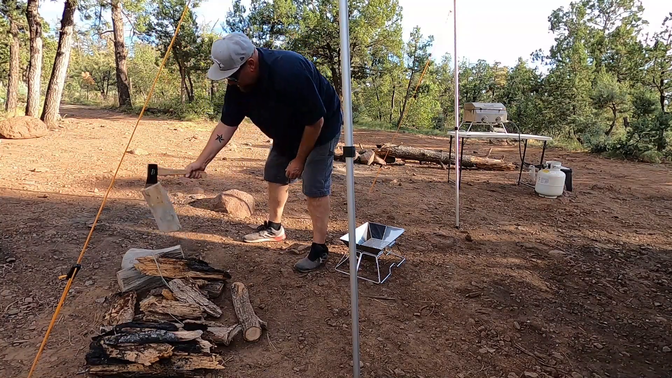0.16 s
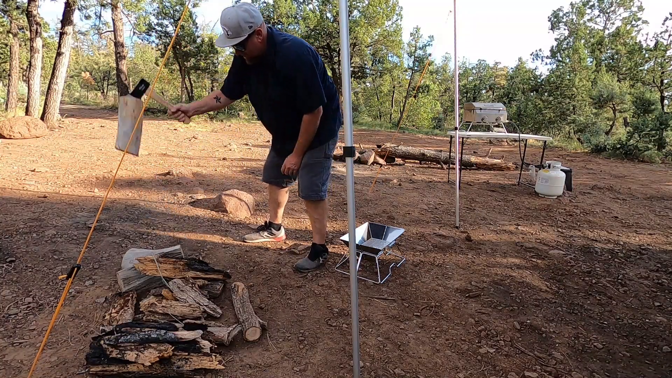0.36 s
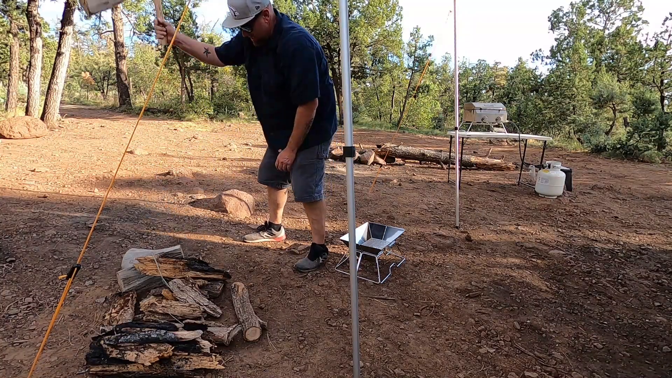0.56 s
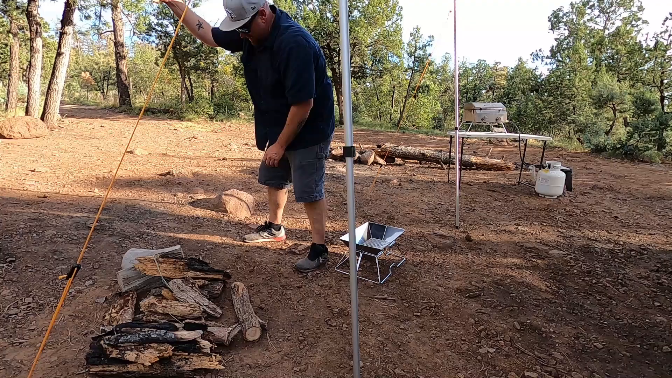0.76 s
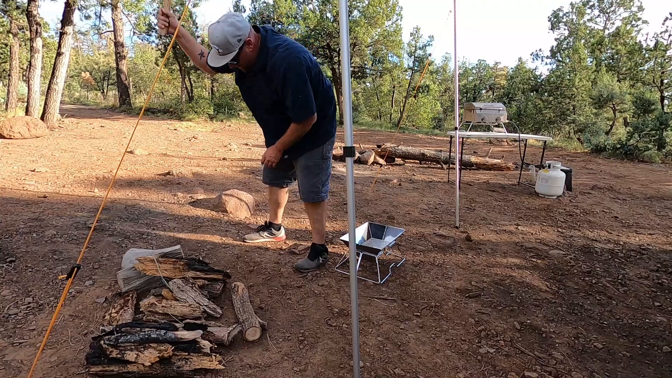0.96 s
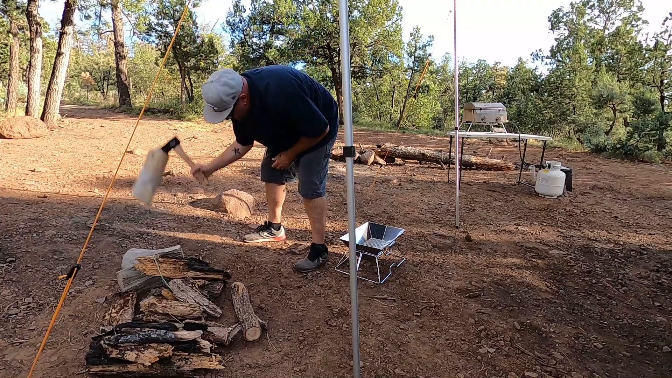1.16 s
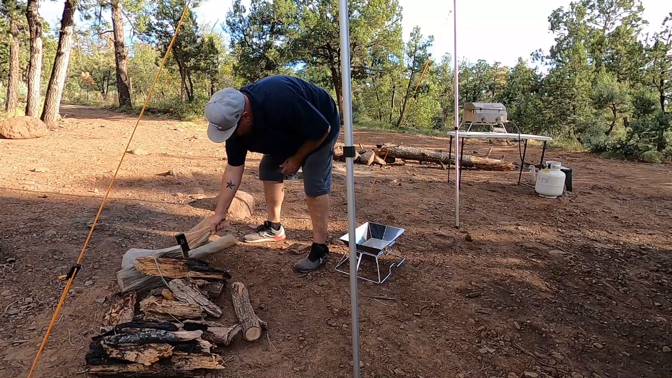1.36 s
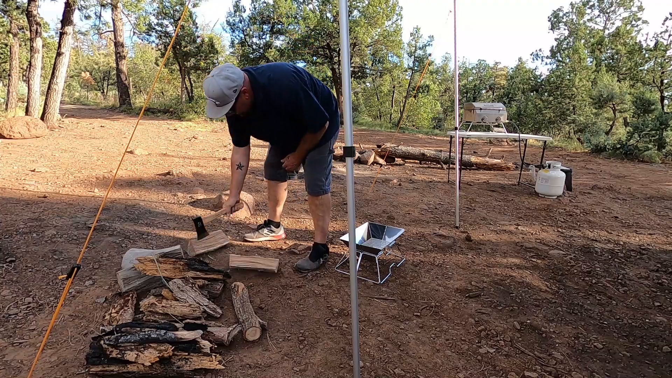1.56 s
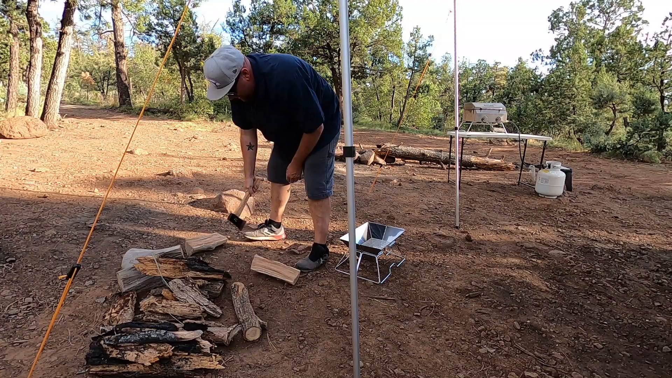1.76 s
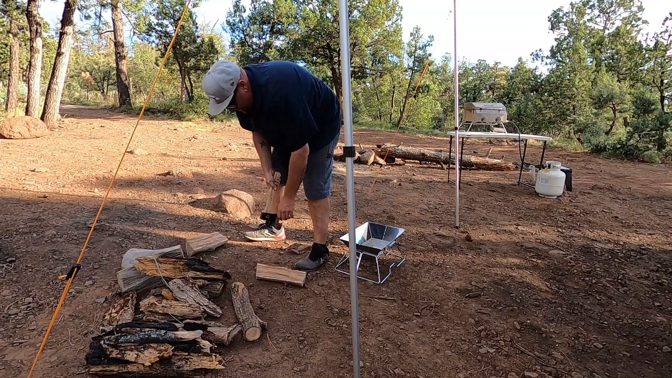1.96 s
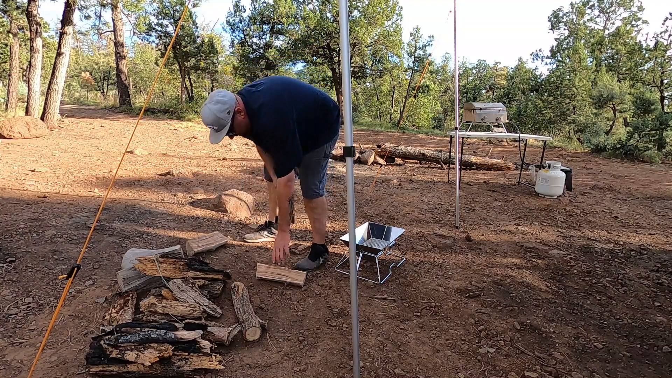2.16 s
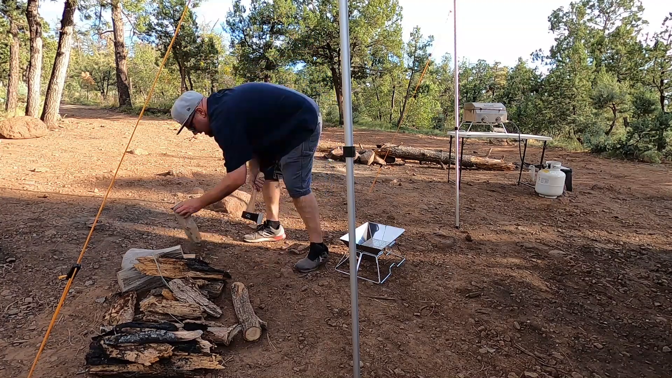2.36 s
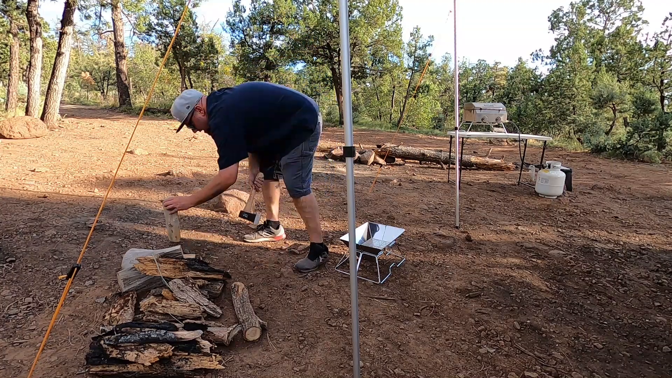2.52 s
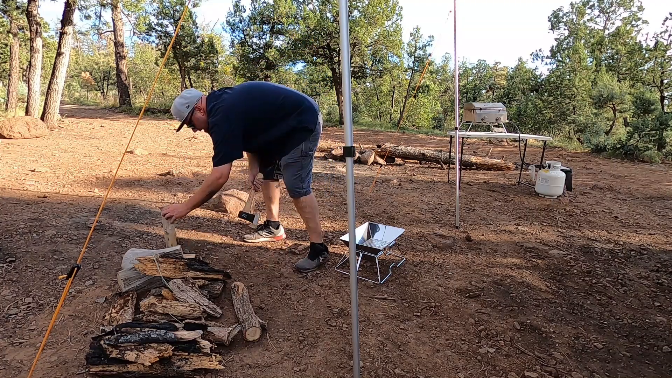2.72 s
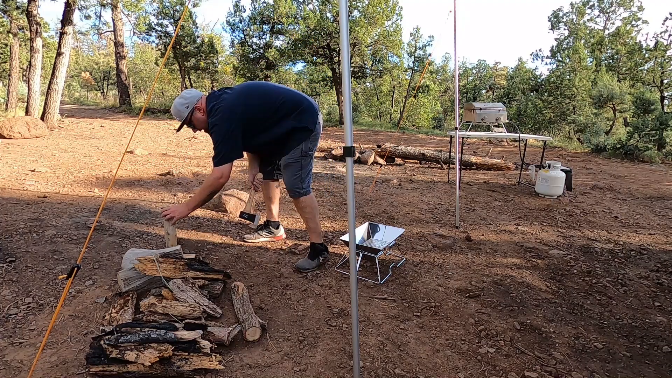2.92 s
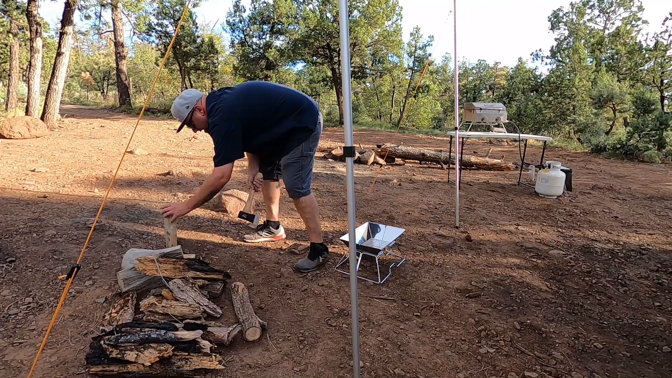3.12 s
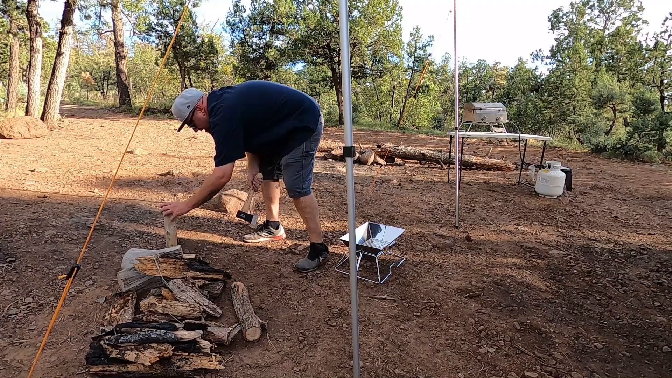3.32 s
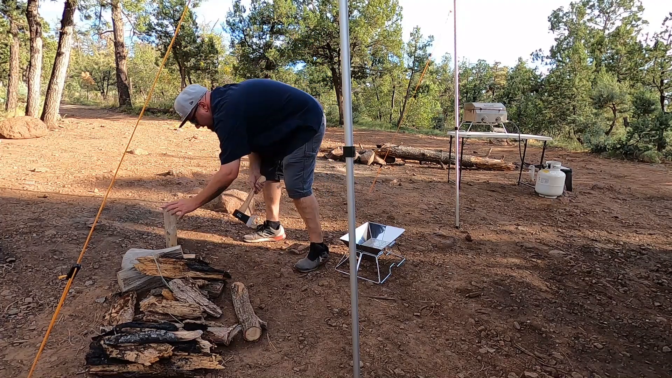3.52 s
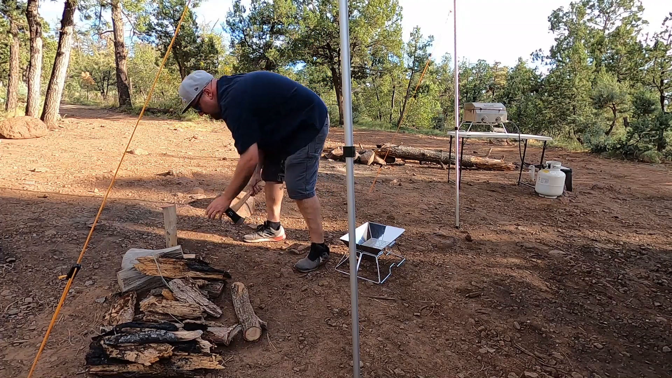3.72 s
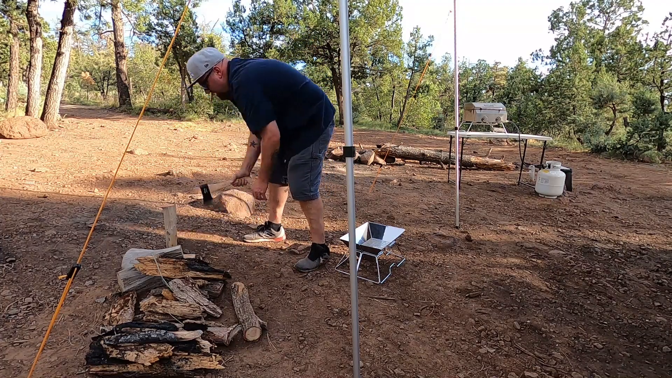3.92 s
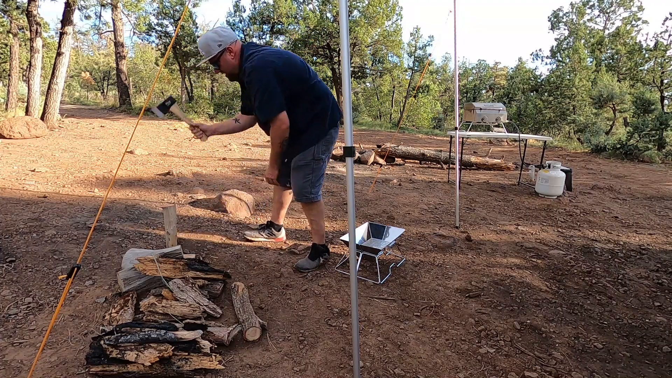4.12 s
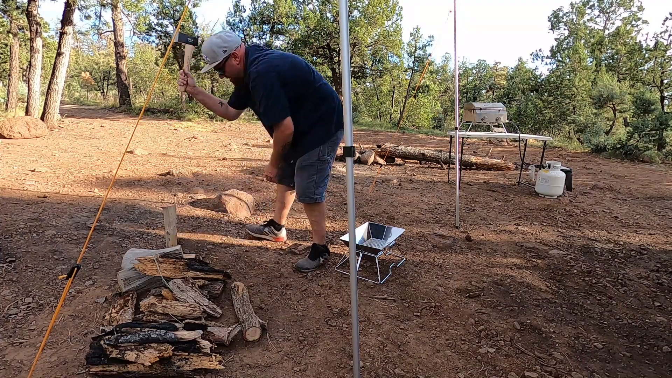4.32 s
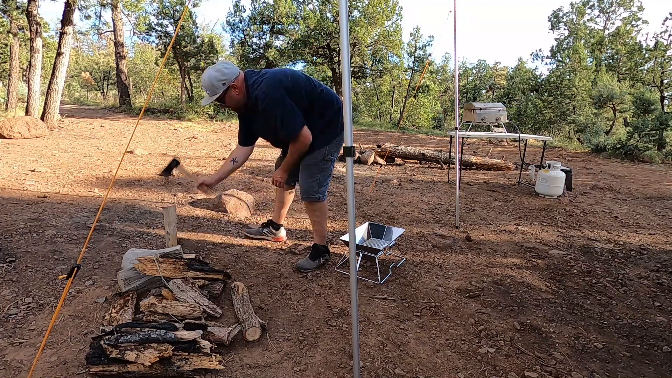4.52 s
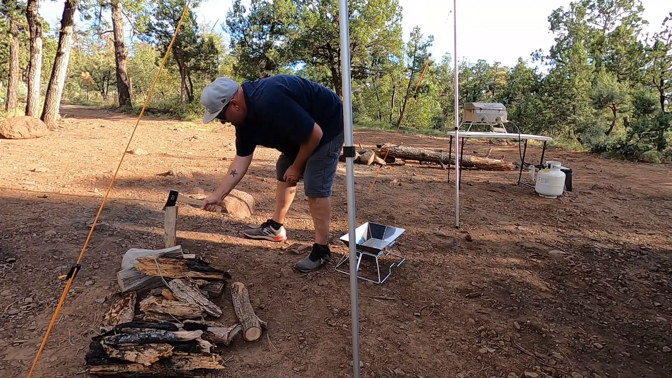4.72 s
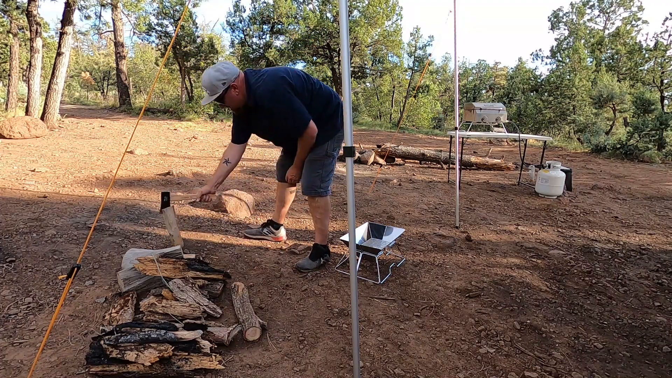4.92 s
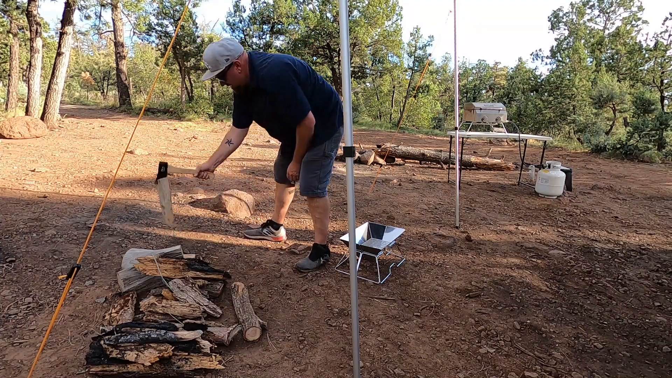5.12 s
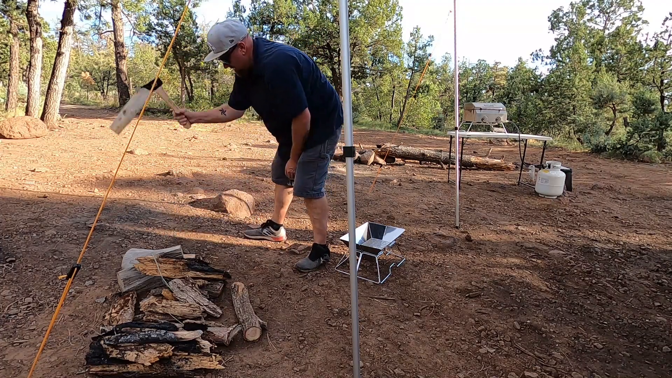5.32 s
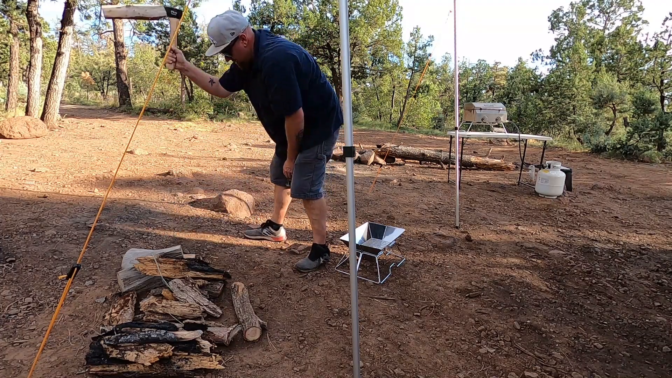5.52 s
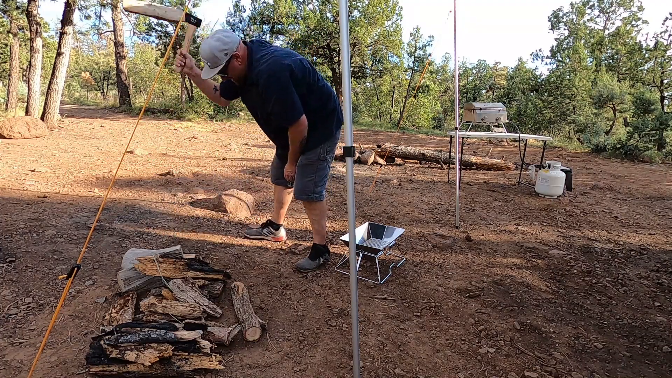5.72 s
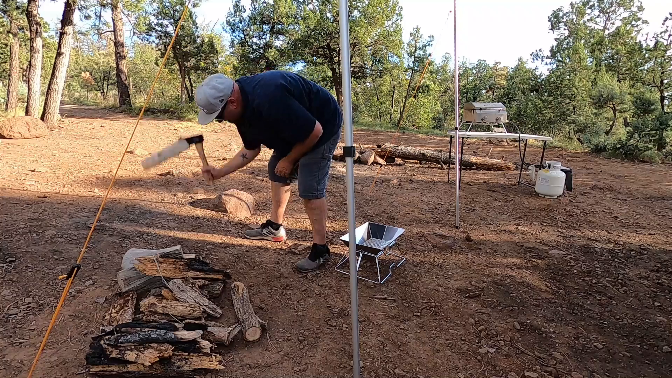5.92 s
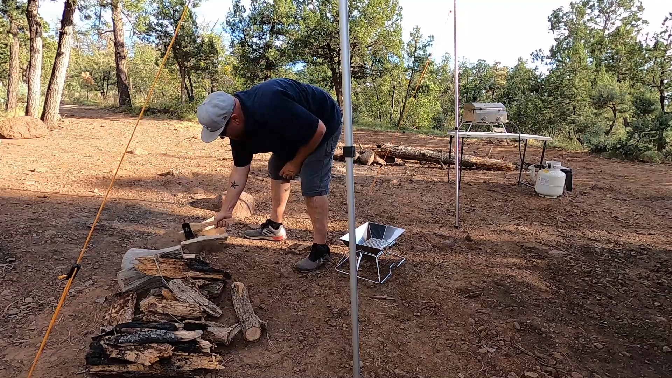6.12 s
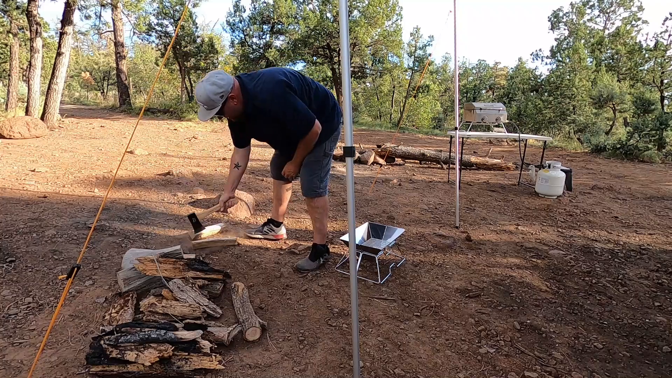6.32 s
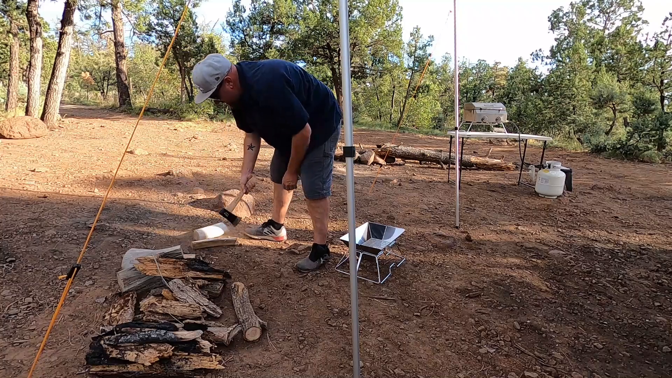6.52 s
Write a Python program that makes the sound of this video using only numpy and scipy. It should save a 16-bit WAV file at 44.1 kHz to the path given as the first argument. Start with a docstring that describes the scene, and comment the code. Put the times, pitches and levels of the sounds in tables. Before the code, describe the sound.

Firewood splitting outdoors, heard from a few metres: a loud crack and low thud, then wooden halves knocking and rolling. A quieter pause has light wood taps, tiny metallic tinkles and grit underfoot. A shoe rasps on dirt before a second hard chop; moments later a third blow rips fibres with bright splintering and ringing wood. Faint breeze hisses through pines, with a short woodland echo.

```python
"""A dirt campsite among pines, heard from a few metres: a man splits firewood with a hatchet.
He slams a stuck log onto the block and its halves clatter away, stands up a new log, bites the blade into it
and slams that down until it tears apart. Wood contacts are band-passed noise bursts that may excite modes; thuds,
steel and hollow notes are damped sines; chips and grit are sparse snaps; scuffs, swings and breeze are shaped noise."""
import sys
import numpy as np
from scipy import signal
from scipy.fft import rfft, irfft, next_fast_len
from scipy.io import wavfile
from scipy.ndimage import map_coordinates

SR = 44100
rng = np.random.default_rng(int(sys.argv[2]) if len(sys.argv) > 2 else 0)


def generate_wav(signal):
    """Clip the signal to [-1, 1] and save it as 16-bit WAV at the path in sys.argv[1]."""
    frames = np.transpose(np.atleast_2d(signal))
    scaled = np.clip(frames, -1, 1) * 32767
    pcm = np.round(scaled).astype(np.int16)
    wavfile.write(sys.argv[1], SR, pcm)


N = 289737
AGE = np.arange(SR // 2) / SR  # time since a contact, s


def amp(db):
    """Decibels to gain."""
    return 10 ** (np.asarray(db) / 20)


def unit(x):
    """Scale to rms 1."""
    return x / np.sqrt(np.mean(x ** 2) + 1e-20)


def fade(t60_s, t_s=AGE):
    """Exponential decay, 60 dB in t60_s."""
    return np.exp(-np.log(1000) * t_s / np.maximum(t60_s, 1e-3))


def along(points, hz):
    """Interpolate (f/Hz, value) points on a log frequency axis."""
    f, value = np.transpose(points)
    return np.interp(np.log(hz + 1), np.log(f + 1), value)


def curves(rows):
    """Interpolate each column after the time to one value per sample."""
    t, *columns = np.transpose(rows)
    return [np.interp(np.arange(N) / SR, t, column) for column in columns]


def wobble(rate_hz):
    """Smooth random curve through rate_hz knots a second."""
    knots = rng.standard_normal(256)
    return map_coordinates(knots, [np.arange(N) * rate_hz / SR], mode="wrap")


def add(track, t_s, sound):
    """Mix a sound into the track at t_s."""
    part = track[max(0, round(t_s * SR)):][:len(sound)]
    part += sound[:len(part)]


def filtered(x, response):
    """Apply a complex response of frequency to x."""
    m = next_fast_len(len(x) + SR // 2)
    return irfft(rfft(x, m) * response(np.fft.rfftfreq(m, 1 / SR)), m)[:len(x)]


def lowpass(x, order, hz):
    """Butterworth low-pass."""
    return signal.sosfilt(signal.butter(order, hz, fs=SR, output="sos"), x)


def highpass(x, order, hz):
    """Butterworth high-pass."""
    return signal.sosfilt(signal.butter(order, hz, "high", fs=SR, output="sos"), x)


def resonance(f, hz, width_hz):
    """Causal response of one mode, 1 at its peak."""
    return 1j * f * width_hz / (hz * hz - f * f + 1j * f * width_hz)


def noise_band(n, hz, width_hz, order=2):
    """White noise through repeated resonances, at rms 1."""
    return unit(filtered(rng.standard_normal(n), lambda f: resonance(f, hz, width_hz) ** order))


def coloured(x, modes):
    """The contact itself plus the modes that it sets ringing."""
    def response(f):
        total = 1
        for hz, db, t60_s in modes:
            width_hz = np.log(1000) / np.pi / t60_s
            total = total + amp(db) * resonance(f, hz, width_hz)
        return total
    return filtered(x, response)


def ring(modes, attack_s):
    """Damped sines that swell with time constant attack_s."""
    sines = sum(amp(db) * fade(t60_s) * np.sin(2 * np.pi * hz * AGE) for hz, db, t60_s in modes)
    return sines * (1 - np.exp(-AGE / attack_s))


def contact(db, hz, t60_s, width, top_hz, snap_db=-15):
    """Splintery burst of wood contact, with the energy of 5 ms at its level; width is relative to hz."""
    t = AGE[:SR // 8]
    unevenness_db = 3.7 * rng.standard_normal(len(t))
    grain = rng.standard_normal(len(t)) * amp(unevenness_db)
    burst = grain * fade(t60_s, t) * (1 - np.exp(-t / 0.00034))
    burst = filtered(burst, lambda f: resonance(f, hz, width * hz))
    body = lowpass(burst, 4, top_hz)  # wood loses its top steeply
    snap = lowpass(burst, 4, 10500) * fade(0.036, t)  # but for a brief snap
    burst = body + amp(snap_db) * snap
    return np.sqrt(0.005 * SR) * amp(db) * burst / np.linalg.norm(burst)


def breeze():
    """Air hisses in the pines over a low, uneven rumble; both follow one strength curve."""
    # Strength in three stretches, interpolated across the gaps: t/s, level/dB
    stretches = [
        [(0.0, -50), (0.236, -48), (0.664, -54), (1.25, -51)],
        [(2.1, -52.5), (2.61, -49.5), (3.33, -53), (4.25, -49.5)],
        [(4.95, -51), (5.434, -54), (6.05, -52)],
    ]
    # Rumble spectrum: f/Hz, relative density/dB
    rumble_spectrum = [(13, -17), (22, -21), (76, -2), (124, -10.5), (168, -2.5), (289, -5), (345, -7),
                       (450, -17), (580, -34), (990, -120)]
    # Pine hiss spectrum: f/Hz, relative density/dB
    pine_spectrum = [(180, -8.5), (300, -12), (342, -7), (384, -7), (492, -8.5), (641, -5), (892, -2),
                     (1200, 1), (1670, -2.5), (1940, -3), (3690, -13.5), (6150, -22), (8140, -31.5),
                     (11100, -35), (15500, -60)]

    def air(spectrum):
        return unit(filtered(rng.standard_normal(N), lambda f: amp(along(spectrum, f))))

    strength_db, = curves(np.vstack(stretches))
    rumble_db = -10.5 + 1.6 * wobble(6.8)  # sways by itself
    hiss_db = 0.5 + 0.5 * wobble(6)
    mix = amp(rumble_db) * air(rumble_spectrum) + amp(hiss_db) * air(pine_spectrum)
    return amp(strength_db) * mix


def crackle(length_s, db, hz):
    """Dense tiny snaps of very uneven size that swell for a quarter of length_s, then thin out."""
    snaps = rng.standard_normal(len(AGE)) * (rng.random(len(AGE)) < 2000 / SR)  # 2000 snaps/s
    grains = unit(filtered(snaps, lambda f: resonance(f, hz, 0.84 * hz) ** 2))
    u = 4 * AGE / length_s
    return lowpass(amp(db) * grains * u * np.exp(1 - u), 4, 10500)


def grit():
    """Grit and bark crunch as shoes and hands shift; pebbles and splinters click."""
    # Crunches of grit and bark: t/s, length/s, level/dB, f/Hz
    crunches = [(0.047, 0.023, -49, 3650), (0.94, 0.092, -49.5, 2840), (1.967, 0.11, -54, 3060),
                (2.029, 0.023, -55, 3900), (2.538, 0.064, -52, 3760), (2.72, 0.083, -47, 3520),
                (3.77, 0.18, -56.5, 2800), (4.076, 0.18, -55.5, 3360), (4.446, 0.048, -47.5, 2620),
                (4.613, 0.059, -49.5, 3600), (4.741, 0.085, -46, 2300), (5.013, 0.033, -48.5, 2040),
                (5.236, 0.041, -44.5, 3180)]
    # Pebbles and splinters under wood and shoe: t/s, level/dB, f/Hz
    clicks = [(1.568, -29, 5270), (1.81, -41, 3950), (1.822, -55, 7540), (4.347, -30, 834),
              (4.407, -35, 1400), (4.449, -35.5, 2130), (4.463, -31, 940), (4.477, -37, 2300),
              (4.4899, -27, 2150), (5.114, -44, 1870), (6.388, -44.5, 3930), (6.403, -46, 5280),
              (6.449, -53, 4470)]
    out = np.zeros(N)
    for t, length_s, db, hz in crunches:
        add(out, t, crackle(length_s, db, hz))
    for t, db, hz in clicks:
        top_hz = min(1.26 * hz, SR / 4)
        add(out, t, contact(db, hz, 0.0093, width=0.58, top_hz=top_hz, snap_db=-28))
    return out


def taps():
    """Light contacts of hatchet and log, with a ring of the steel head at its own level."""
    # Contacts: t/s, level/dB, f/Hz, t60/s, steel ring level/dB
    touches = [(0.084, -32, 1430, 0.028, -41), (0.094, -44, 900, 0.015, -69),
               (0.216, -35.5, 2220, 0.0065, -53), (0.343, -40, 1570, 0.015, -58),
               (2.542, -39.5, 2280, 0.01, -77), (2.623, -40, 1040, 0.11, -70),
               (2.735, -38.5, 1980, 0.094, -73), (4.849, -37.5, 2170, 0.036, -40),
               (5.2295, -26.5, 2920, 0.0067, -33)]
    # Steel head modes: f/Hz, relative level/dB, t60/s
    steel_modes = [(1940, -6.5, 0.085), (2600, -2, .06), (3470, -1, 0.065), (5870, -9, 0.056)]
    out = np.zeros(N)
    for t, db, hz, t60_s, steel_db in touches:
        add(out, t, contact(db, hz, t60_s, width=1.1, top_hz=5300))
        add(out, t, amp(steel_db) * ring(steel_modes, attack_s=0.00042))
    return out


def thud(db, hz):
    """A landing pushes the ground (one damped sine) and rocks the chopping block (its modes)."""
    # Chopping block modes: f/Hz, relative level/dB, t60/s
    block_modes = [(85, -53, 0.033), (128.4, -5, 0.13), (175, 0, 0.07), (242.6, -1.5, 0.061),
                   (327, -12.5, 0.079), (517, -10.5, 0.071)]
    push = ring([(hz, 2, 0.054)], attack_s=0.001)
    return amp(db) * (push + ring(block_modes, attack_s=0.0073))


def thuds():
    """Logs drop or are set down: a dull bump plus a knock."""
    # Weight landing on block and ground: t/s, thud level/dB, thud f/Hz, knock level/dB, knock f/Hz
    bumps = [(0.088, -29, 134, -33.5, 444), (1.388, -23, 130, -29, 450), (1.561, -15, 243, -17.5, 400),
             (1.747, -33.5, 200, -39, 500), (2.733, -30, 173, -39, 295)]
    out = np.zeros(N)
    for t, db, hz, knock_db, knock_hz in bumps:
        add(out, t, thud(db, hz))
        add(out, t, contact(knock_db, knock_hz, 0.063, width=0.56, top_hz=2520, snap_db=-20))
    return out


def tinkles():
    """Each touch of small metal gives a bright noise tick and one high damped ping."""
    # Touches: t/s, ping level/dB, tick level before a 1.5 dB lift/dB
    touches = [(0.462, -49, -62), (0.683, -58, -53), (0.774, -48.5, -56), (1.054, -48, -75),
               (2.43, -44.5, -57), (2.609, -37, -44), (3.493, -57.5, -51.5), (5.095, -47, -73)]
    # Ping mode: f/Hz, relative level/dB, t60/s
    ping_modes = [(6000, 0, 0.044)]
    out = np.zeros(N)
    for t, ping_db, tick_db in touches:
        tick = noise_band(len(AGE), 6900, 4500) * fade(0.016)
        ping = ring(ping_modes, attack_s=0.00079)
        add(out, t, amp(ping_db) * ping + amp(tick_db + 1.5) * tick)
    return out


def swings():
    """The log sweeps through the air: a broad swish that swells exponentially and stops on arrival."""
    # Swings: arrival t/s, final level/dB, f/Hz
    sweeps = [(1.32, -40.5, 970), (4.668, -42.5, 1000), (6.118, -36, 1120)]
    out = np.zeros(N)
    for t, db, hz in sweeps:
        air = noise_band(len(AGE), hz, 2.5 * hz, order=3)
        add(out, t - AGE[-1], amp(db) * air * fade(0.22)[::-1])
    return out


def chops():
    """Each crack is led in by two fainter, duller copies 11 ms apart and rings the log; the blade bites, the
    block thuds, fibres tear, chips settle."""
    # Blows: t/s, crack level/dB, crack f/Hz, loss per earlier faint lead-in/dB, bite level/dB, thud level/dB,
    # thud f/Hz, tearing level/dB, tearing f/Hz, tearing length/s
    blows = [(1.332, -10, 1280, 9, -27.5, -9, 107, -32, 2550, 0.064),
             (4.6783, -7.5, 1600, 15, -21, -6, 204.6, -34, 3780, 0.05),
             (6.119, -10.5, 3100, 23, -11.5, -7, 199, -24.5, 4200, 0.051)]
    # Log modes: f/Hz, level relative to the contact/dB, t60/s
    log_modes = [(557, 5.5, 0.037), (860, -7, 0.056), (1016, 3.5, 0.017), (1105, -8.5, 0.013),
                 (1520, -17, 0.17), (1990, -2, 0.028), (2004, -21, 0.098), (3080, -7, 0.014),
                 (3530, 0, 0.02)]
    lead_s, lead_pitch, lead_t60_s = 0.011, 0.68, 0.055  # spacing, pitch over the crack's, decay
    thud_lag_s, tear_lag_s, bite_lag_s, chips_lag_s = 0.00453, 0.006, 0.0075, 0.037
    knocks, rest = np.zeros(N), np.zeros(N)
    for t, db, hz, lead_loss_db, bite_db, thud_db, thud_hz, tear_db, tear_hz, tear_s in blows:
        for k in (1, 2):
            lead_db = db - k * lead_loss_db
            lead = contact(lead_db, hz * lead_pitch, lead_t60_s, width=1.0, top_hz=4800, snap_db=-15)
            add(knocks, t - k * lead_s, lead)
        add(knocks, t, contact(db, hz, 0.016, width=0.96, top_hz=5250, snap_db=-11))
        # the blade wedges deeper just after the crack
        add(rest, t + bite_lag_s, contact(bite_db, 2400, 0.046, width=8.8, top_hz=5430))
        add(rest, t + thud_lag_s, thud(thud_db, thud_hz))
        add(rest, t + tear_lag_s, crackle(tear_s, tear_db, tear_hz))  # fibres part behind the blade
        add(rest, t + chips_lag_s, crackle(0.24, -49, 2860))  # bark and chips
    return coloured(knocks, log_modes) + rest


def rocking(db, hz, loss_db, pitch_kept, width):
    """Wood landing rocks from edge to edge: a run of contacts, each with a further loss and pitch factor."""
    # Touches: t after the first/s, level before the rebound loss/dB, t60/s
    touches = [(0, -0.5, 0.046), (0.0052, -6, 0.07), (0.011, 0, 0.022), (0.021, -0.5, 0.015)]
    out = np.zeros(len(AGE))
    for k, (lag_s, touch_db, t60_s) in enumerate(touches):
        level_db = db + touch_db - k * loss_db
        touch_hz = hz * pitch_kept ** k
        add(out, lag_s, contact(level_db, touch_hz, t60_s, width, top_hz=4800, snap_db=-13))
    return lowpass(out, 1, 7500)  # dirt softens the touch


def halves():
    """Half logs clack on ground and woodpile; dirt damps their hollow note, which wavers as they rock."""
    # Landings: t/s, clack level/dB, clack f/Hz, loss per rebound/dB, pitch factor per rebound,
    # note level/dB, note f/Hz, share of the free ring time
    landings = [(1.423, -41.5, 890, 4, 0.67, -24, 241, 0.89),
                (1.547, -13, 2920, 2.9, 0.9, -18.5, 236.3, 0.95),
                (1.693, -29, 1110, 21, 0.75, -38, 231, 0.68), (1.743, -24.5, 1960, 6, 0.39, -31, 375, 0.7),
                (1.785, -29, 1300, 1.5, 0.99, -36, 240, 0.6), (1.883, -39, 1340, 4, 1.2, -53, 238, 0.5),
                (1.9098, -28.5, 1480, 3, 0.77, -31.5, 238.4, 0.89)]
    # Modes that colour the clacks: f/Hz, level relative to the contact/dB, t60/s
    piece_modes = [(1104, 6, 0.031), (1297, 9, 0.021), (1412, 12.5, 0.058), (1970, 6.5, 0.041),
                   (2140, -4, 0.09), (4050, -1, 0.042)]
    # Hollow note: multiple of the note f, relative level/dB, free t60/s
    hollow_modes = [(.54, -22, 0.24), (1.001, -0.5, 0.27), (1.62, -13, 0.13)]
    note_lag_s = 0.0063
    clacks, notes = np.zeros(N), np.zeros(N)
    for t, db, hz, loss_db, pitch_kept, note_db, note_hz, freedom in landings:
        add(clacks, t, rocking(db, hz, loss_db, pitch_kept, width=0.88))
        modes = [(note_hz * ratio, level_db, t60_s * freedom) for ratio, level_db, t60_s in hollow_modes]
        add(notes, t + note_lag_s, amp(note_db) * ring(modes, attack_s=0.00083))
    waver_db = 1.6 * wobble(34.3)
    return coloured(clacks, piece_modes) + notes * amp(waver_db)


def scuff():
    """Grit rasps under a twisting sole: four noise bands, weighted by closeness to a moving pitch."""
    # Twist: t/s, level before a 9.5 dB cut/dB, f/Hz
    twist = [(4.27, -84, 700), (4.292, -42.5, 740), (4.325, -36.5, 800), (4.38, -37, 990),
             (4.44, -40, 1470), (4.5, -36, 2040), (4.54, -46, 2000), (4.6, -72, 2060)]
    db, pitch_hz = curves(twist)
    rasp = np.zeros(N)
    for hz in (692, 1020, 1660, 2450):
        octaves_off = np.log2(pitch_hz / hz)
        rasp += noise_band(N, hz, 0.33 * hz) * np.exp(-(octaves_off / 1.6) ** 2)
    rasp = lowpass(rasp, 2, 6000)  # the sole muffles the top
    stick_slip_db = 3.5 * wobble(37)
    return amp(db - 9.5 + stick_slip_db) * rasp


def slab():
    """The last fibres snap and free a slab; each bounce clacks, thuds and rings its modes at new strengths."""
    # Bounces: t/s, clack level/dB, clack f/Hz, loss per rebound/dB, pitch factor per rebound,
    # ring level/dB, thud level/dB
    bounces = [(6.1657, -13, 950, 6, 0.89, -28, -12), (6.311, -32, 1760, 2, 0.8, -45, -37),
               (6.382, -37.5, 2200, 1, 0.93, -45, -33)]
    # Slab modes: f/Hz, mean relative level/dB, t60/s
    slab_modes = [(403, -0.5, 0.12), (519, -7.5, 0.22), (550, -11, 0.088), (760, -1, 0.094), (948, -6, .16),
                  (1600, -3, 0.21), (1960, -7, 0.23), (2173, 5.5, 0.11), (2380, 2.5, 0.099)]
    flat_lag_s = 0.006  # falls flat just after the first touch
    out = np.zeros(N)
    add(out, 6.1624, contact(-11.5, 2920, 0.0048, width=0.27, top_hz=4560))  # fibres snap
    for t, db, hz, loss_db, pitch_kept, ring_db, thud_db in bounces:
        modes = [(mode_hz, level_db + rng.normal(0, 4.1), t60_s) for mode_hz, level_db, t60_s in slab_modes]
        add(out, t, rocking(db, hz, loss_db, pitch_kept, width=0.38))
        add(out, t + flat_lag_s, amp(ring_db) * ring(modes, attack_s=0.0012) + thud(thud_db, 130))
        # dull knock of the flat side
        knock = contact(thud_db - 0.5, 394, 0.05, width=0.46, top_hz=2500, snap_db=-30)
        add(out, t + flat_lag_s, knock)
    return out


def campsite(x):
    """Canopy and nearby gear answer early, trees scatter a fainter long echo: decaying noise, duller than x."""
    # Echo decay among the trunks: f/Hz, t60/s
    forest_decay = [(100, 0.18), (400, 0.53), (1200, 0.4), (3000, 0.29), (6000, 0.32), (13000, 0.65)]
    near = np.zeros(len(AGE))
    add(near, 0.0105, rng.standard_normal(len(AGE)) * fade(0.13))
    hz, t, z = signal.stft(rng.standard_normal(SR), SR, nperseg=256)
    decay = fade(along(forest_decay, hz)[:, None], t)
    far = signal.istft(z * decay, SR, nperseg=256)[1][:SR]
    far = far * (1 - np.exp(-np.arange(len(far)) / SR / 0.063))  # builds up gradually
    dull = lowpass(x, 1, 8000)

    def echo(tail):
        return signal.fftconvolve(dull, tail / np.linalg.norm(tail))[:N]

    return amp(-12.5) * echo(near) + amp(-21) * echo(far)


def scene():
    """All the work with its echoes, in the breeze."""
    wood = swings() + chops() + thuds() + halves() + slab()
    work = wood + taps() + tinkles() + scuff() + grit()
    work = highpass(work, 4, 66)  # small logs radiate no deep bass
    return (work + campsite(work) + breeze())[None]


def record(dry):
    """The hardest peaks flatten at full scale; the microphone chain cuts deep bass and all above 16 kHz."""
    x = dry[0] / (1 + np.abs(dry[0]) ** 8) ** (1 / 8)
    x = highpass(x, 2, 36)
    return filtered(x, lambda f: f < 16000)[None]


dry = scene()
out = record(dry)
generate_wav(out)
```